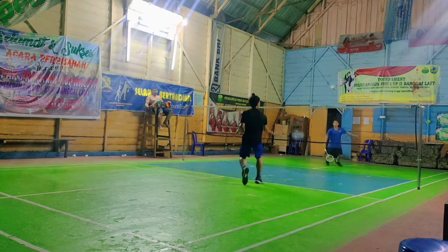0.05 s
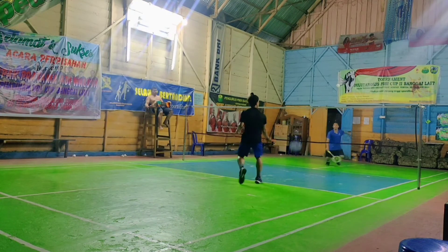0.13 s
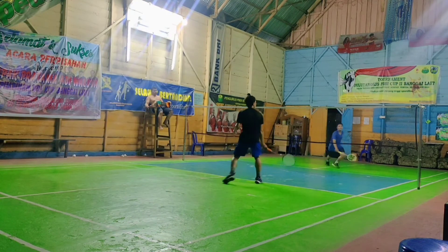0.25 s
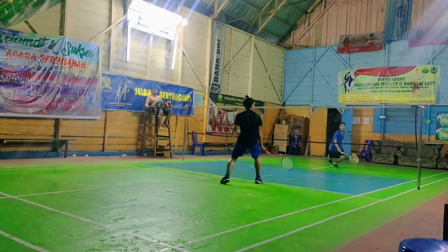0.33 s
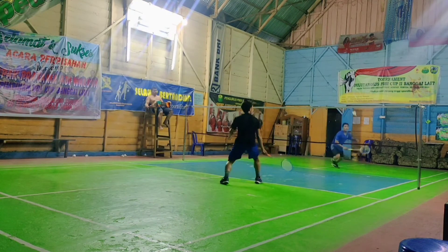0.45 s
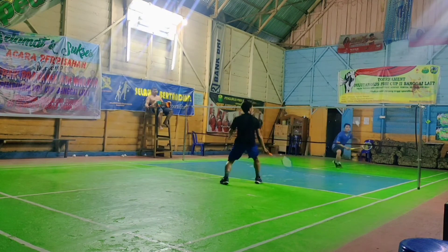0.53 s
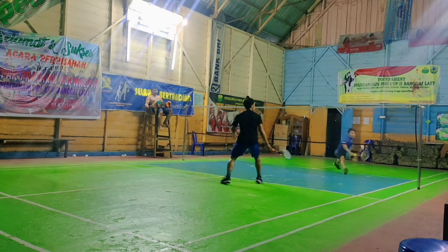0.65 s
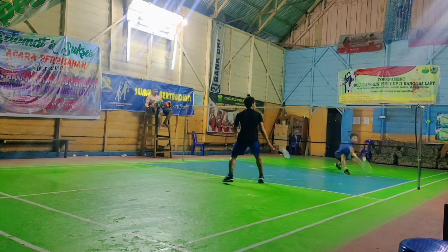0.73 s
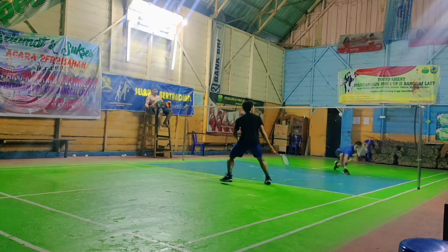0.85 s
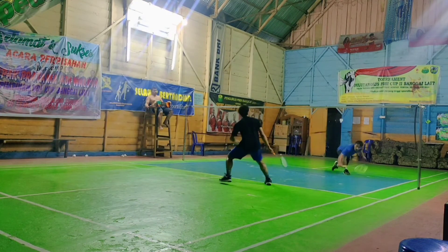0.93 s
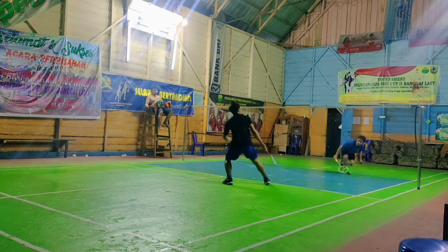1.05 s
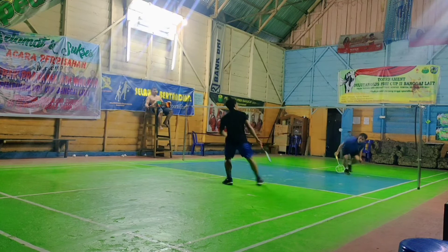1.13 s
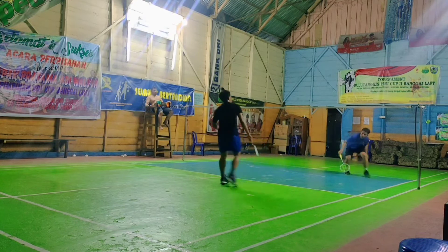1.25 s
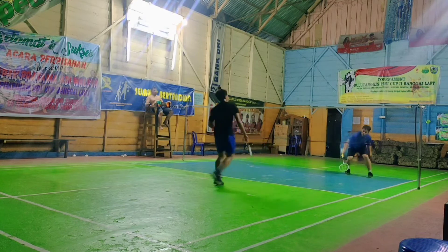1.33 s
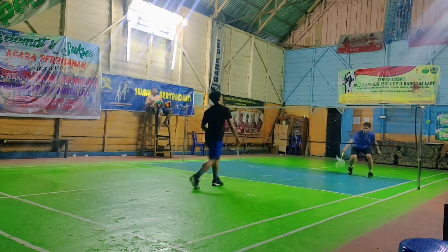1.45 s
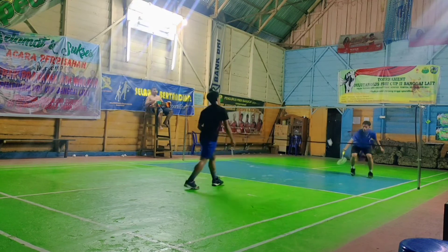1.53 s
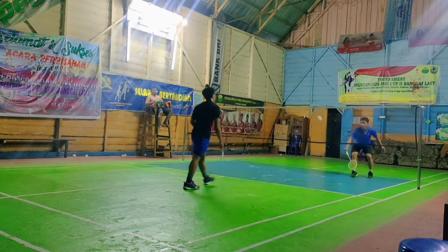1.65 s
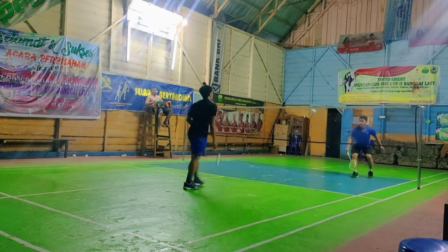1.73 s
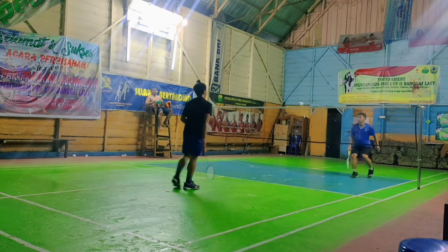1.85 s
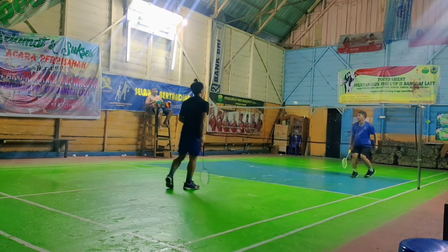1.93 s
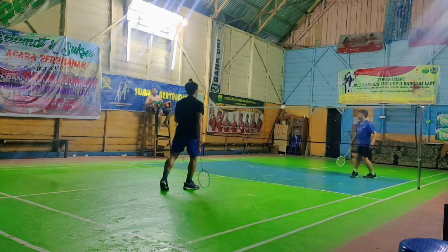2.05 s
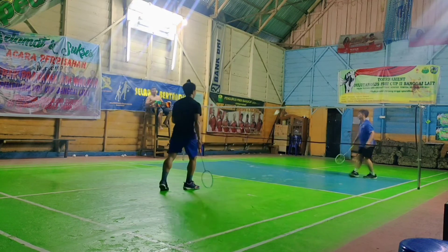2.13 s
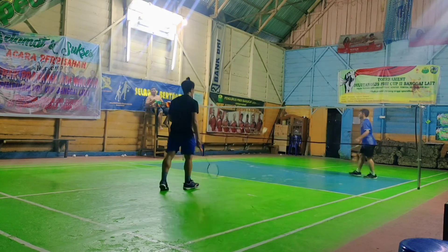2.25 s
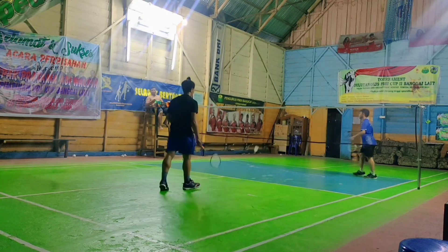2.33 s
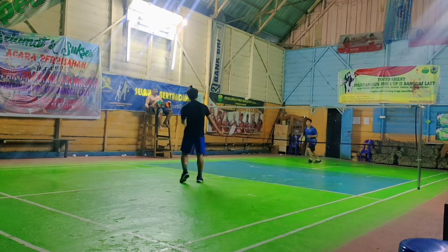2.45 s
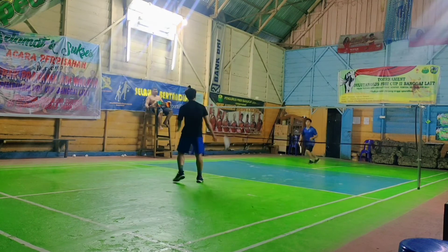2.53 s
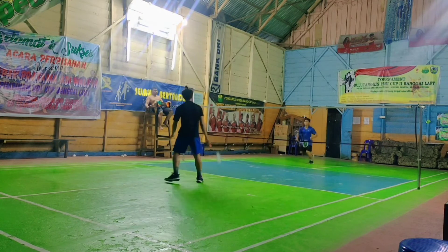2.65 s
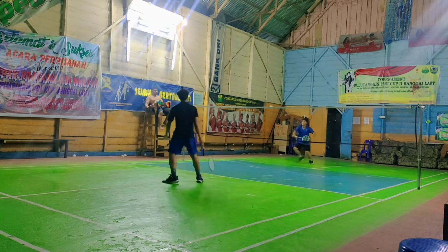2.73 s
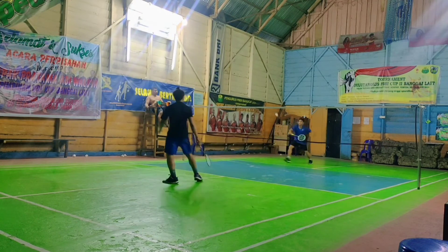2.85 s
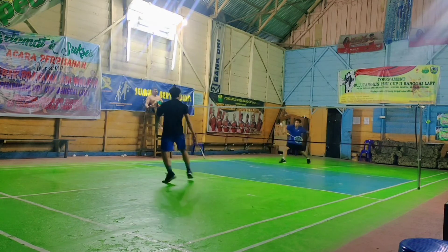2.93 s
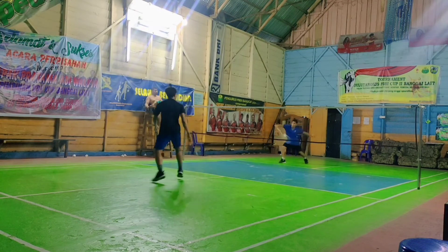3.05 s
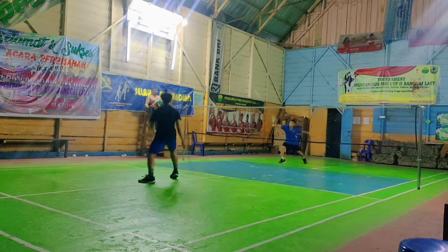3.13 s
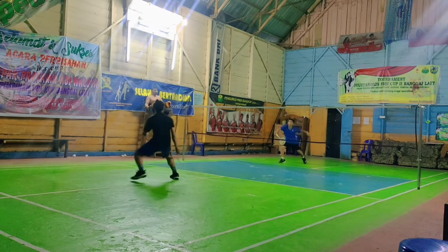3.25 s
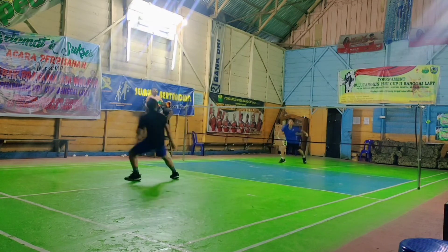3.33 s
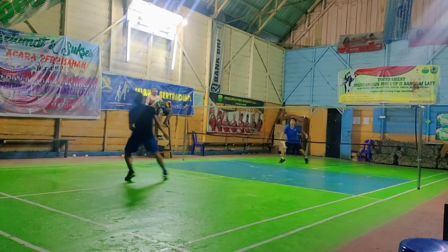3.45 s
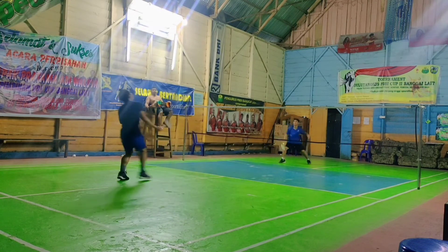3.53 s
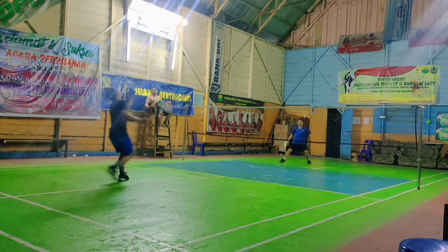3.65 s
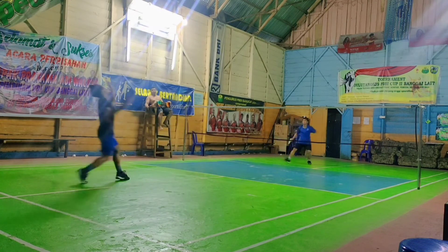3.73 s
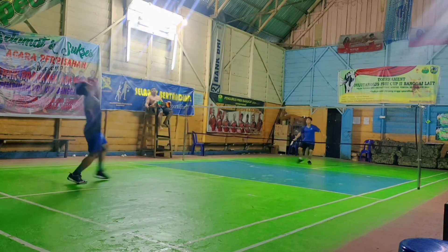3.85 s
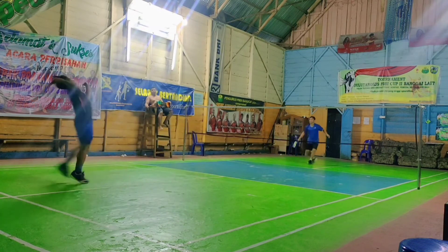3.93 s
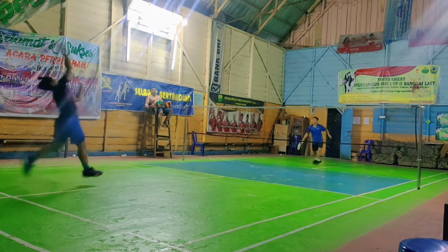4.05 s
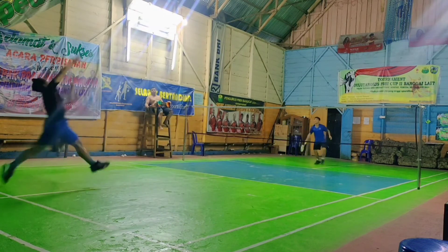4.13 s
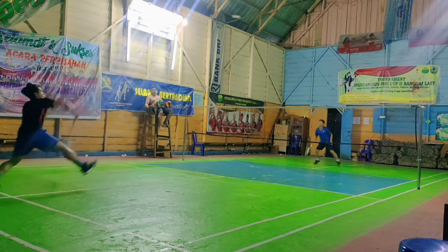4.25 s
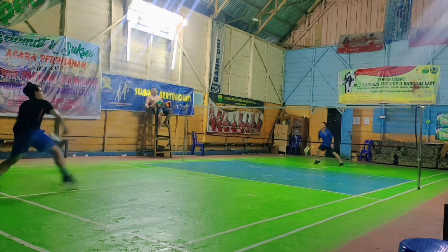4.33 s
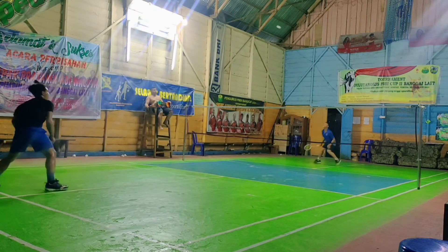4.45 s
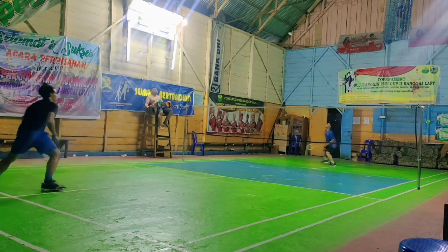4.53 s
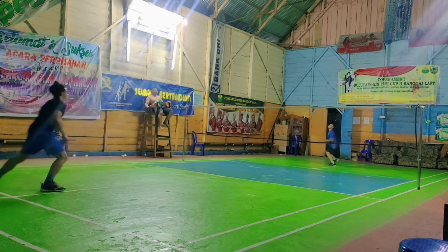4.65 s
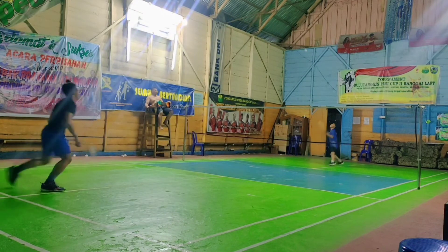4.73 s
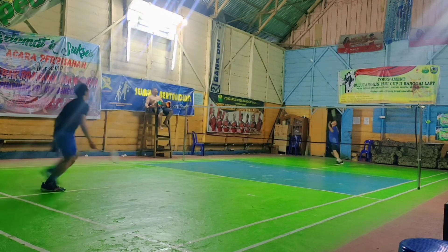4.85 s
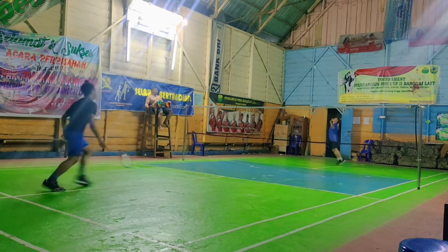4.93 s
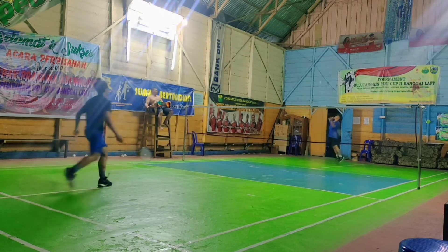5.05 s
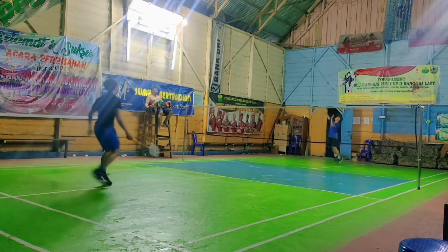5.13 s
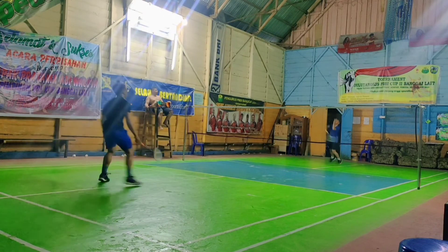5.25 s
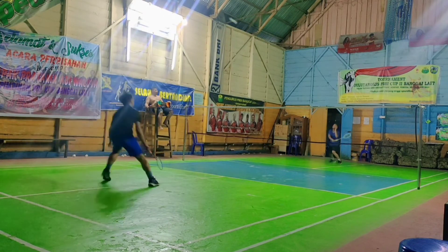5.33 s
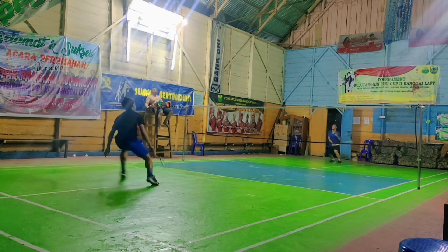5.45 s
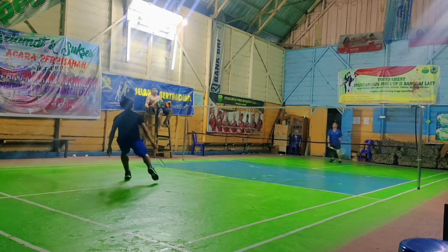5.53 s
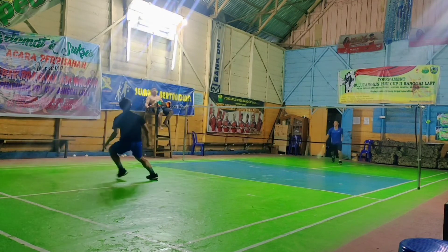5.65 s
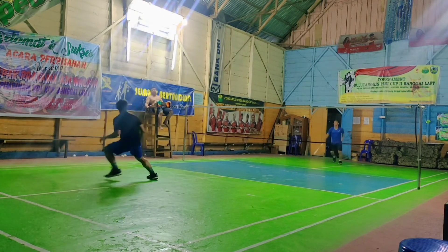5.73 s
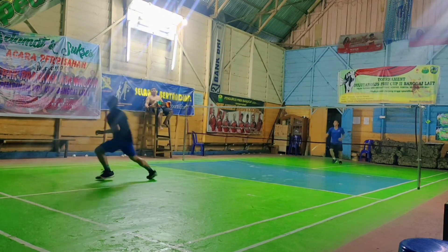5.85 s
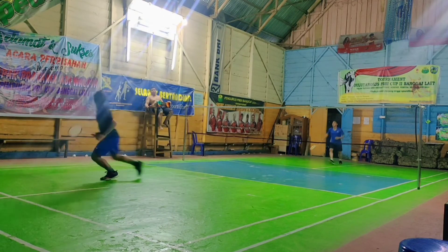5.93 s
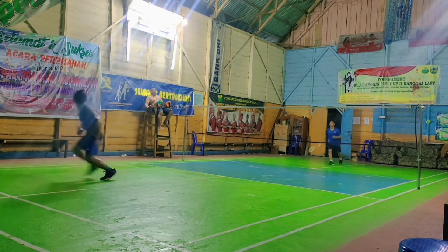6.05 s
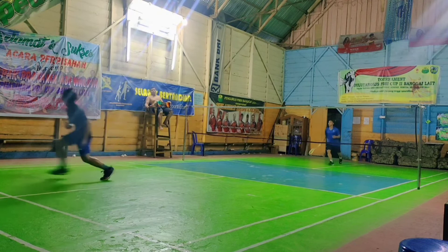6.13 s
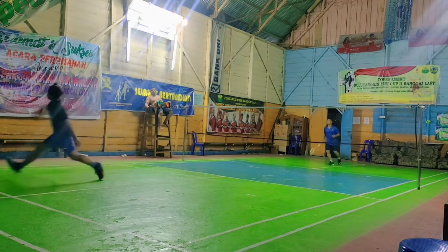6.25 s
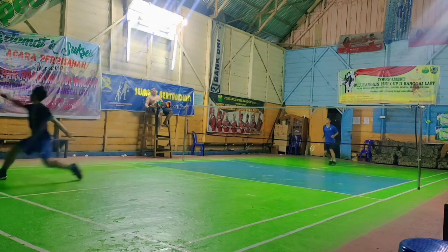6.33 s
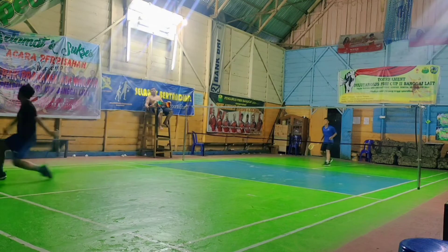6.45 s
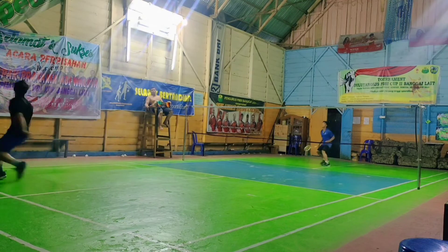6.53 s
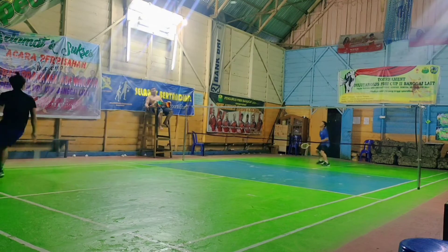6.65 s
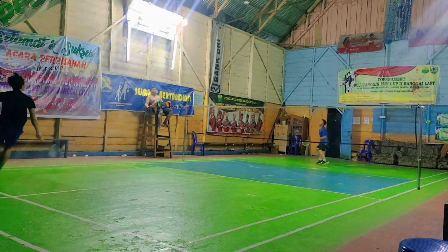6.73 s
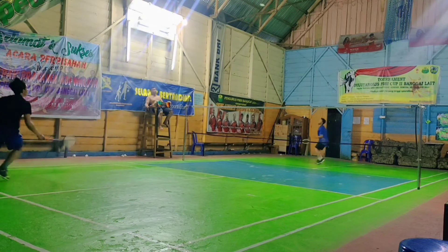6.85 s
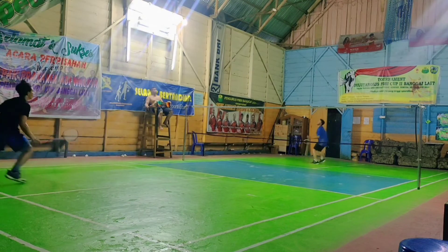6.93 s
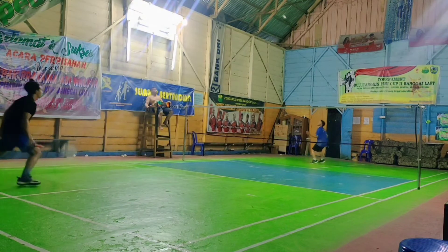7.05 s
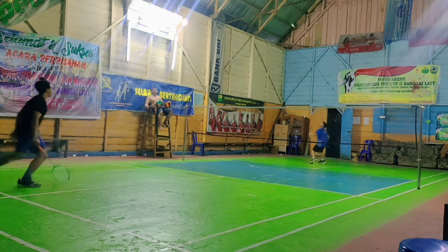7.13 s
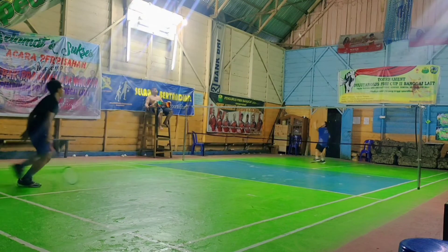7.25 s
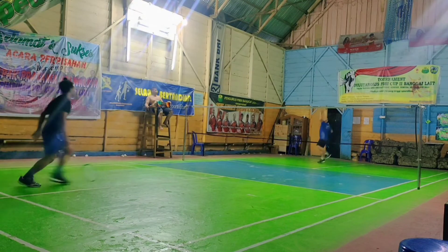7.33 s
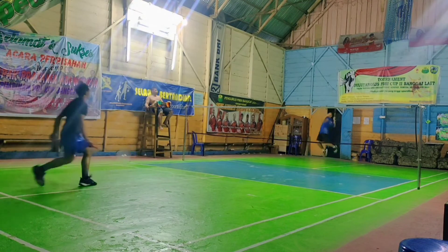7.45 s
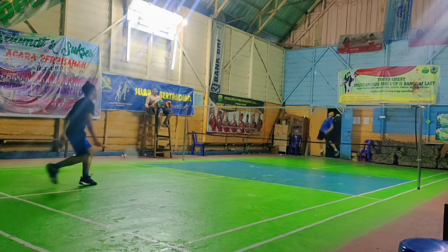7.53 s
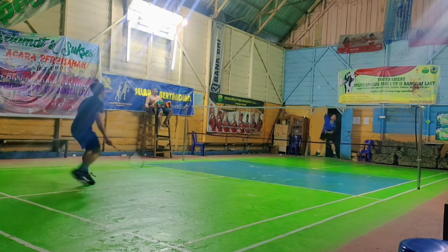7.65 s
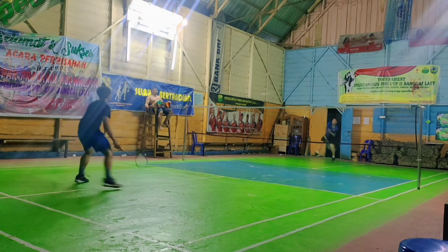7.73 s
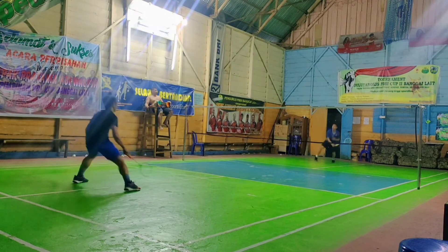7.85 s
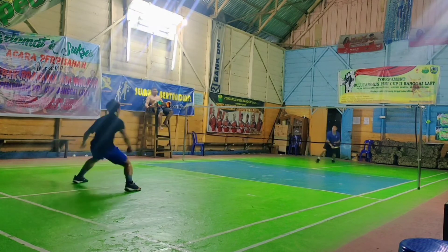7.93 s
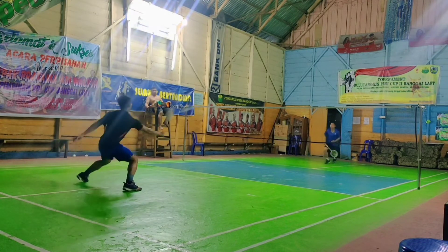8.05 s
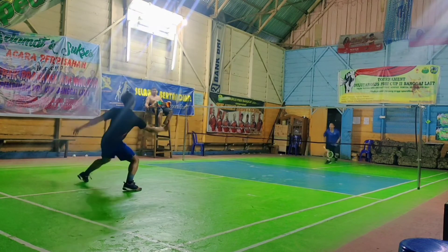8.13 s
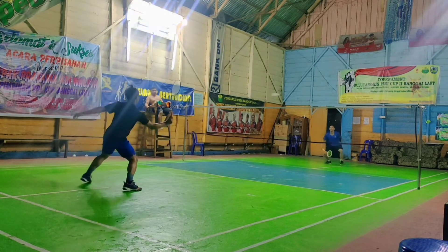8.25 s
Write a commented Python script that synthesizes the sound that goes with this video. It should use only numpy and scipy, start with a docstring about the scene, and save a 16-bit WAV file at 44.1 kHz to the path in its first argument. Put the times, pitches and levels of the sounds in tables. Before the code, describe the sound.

Two players rally at badminton in a big hard-walled hall, heard from courtside in stereo. A distant hit is still fading at first; then racket strikes snap and ring at irregular gaps of one or two seconds. Between them come brief high shoe squeaks, dry scuffs and thuds on the painted floor, some booming low. A quiet ventilation drone lies underneath, and everything echoes for about two seconds.

```python
"""A distant racket strike is still ringing in a large hard-walled sports hall, over droning ventilation.
Then a shuttlecock rally, heard from the court side by two spaced microphones: rackets swish as gliding
tones and strike as ringing modes with a crack of cork and feathers. Rubber soles squeak by stick-slip,
scuff as hiss and thud on the painted floor, which booms under landings.
Echoes and a hall response of thickening noise make the hall ring on for two seconds."""
import sys
import numpy as np
from scipy import signal
from scipy.io import wavfile

SR = 44100
rng = np.random.default_rng(int(sys.argv[2]) if len(sys.argv) > 2 else 0)


def linear_from_db(decibels):
    """Turn decibels (scalar or array-like) into linear amplitude factors; 0 gives 1."""
    return 10 ** (np.asarray(decibels, float) / 20)


def bounce(signal):
    """Save signal as a 16-bit WAV file at the path given by the first command-line argument."""
    frames = np.transpose(np.atleast_2d(signal))
    limited = np.clip(frames, -1, 1)
    pcm = np.round(limited * 32767).astype(np.int16)
    wavfile.write(sys.argv[1], SR, pcm)


N = 366030

DIRECT_DB = 2.5   # the straight path stands out before the hall answers


def rms_one(x):
    """Scale to an rms of 1."""
    return x / np.sqrt(np.mean(x ** 2) + 1e-20)


def at_hz(points, hz):
    """Read a curve of (hz, value) points along a logarithmic frequency axis."""
    points_hz, values = np.array(points).T
    return np.interp(np.log(hz), np.log(points_hz), values)


def band(x, low_hz, high_hz):
    """Keep what lies between two frequencies."""
    return signal.sosfilt(signal.butter(2, [low_hz, high_hz], "band", fs=SR, output="sos"), x)


def high_pass(x, order, hz):
    """Cut what lies below a frequency."""
    return signal.sosfilt(signal.butter(order, hz, "high", fs=SR, output="sos"), x)


def add(out, start_s, piece):
    """Lay a piece into a track at its time."""
    i = round(start_s * SR)
    out[..., i:i + piece.shape[-1]] += piece[..., :N - i]


def wander(size, hz):
    """Low-passed noise of spread 1, for slow unsteadiness."""
    noise = rng.standard_normal(size + 500)
    slow = signal.sosfilt(signal.butter(2, hz, fs=SR, output="sos"), noise)
    return rms_one(slow[500:])


def diffuse(white, shape):
    """Third-octave bands of (mid, side) noise become left and right by their likeness; shape(hz) is the gain."""
    # how alike the two spaced microphones hear sound from all around: hz, likeness (-1 to 1)
    likeness = [(60, 0.49), (130, 0.79), (290, 0.88), (640, 0.47), (1410, -0.37), (3100, 0.19),
                (6820, -0.075), (15000, 0.086)]
    out = 0
    edges = 28 * 2 ** np.arange(0, 9.5, 1 / 3)
    for k, (low_hz, high_hz) in enumerate(zip(edges, edges[1:])):
        mid, side = band(white[k % 2], low_hz, high_hz)
        centre_hz = np.sqrt(low_hz * high_hz)
        alike = np.clip(at_hz(likeness, centre_hz), -1, 1)
        pair = np.sqrt(1 + alike) * mid + np.sqrt(1 - alike) * side * [[1], [-1]]
        out = out + shape(centre_hz) * pair
    return out


def steady_air():
    """Steady noise of the hall's air, shaped in frequency and spread over both microphones."""
    # spectrum of the air before it is set to one overall level: hz, relative_db
    air_spectrum = [(30, -14), (100, -4.5), (160, -12), (260, -2.5), (420, -5), (700, -9.5), (950, -15.5),
                    (1300, -12), (2600, -17), (4000, -35), (8000, -32), (15000, -58)]
    air = diffuse(rng.standard_normal((2, 2, N)), lambda hz: linear_from_db(at_hz(air_spectrum, hz)))
    return linear_from_db(-60.5) * rms_one(air)


def hum():
    """Ventilation drones in a few narrow wavering lines, cut from noise."""
    # ventilation lines: centre_hz, width_hz, level_db
    drones = [(211.6, 13.6, -66.5), (261.4, 5.9, -66), (311.8, 7.5, -70)]
    white = rng.standard_normal(N)
    return sum(linear_from_db(db) * rms_one(band(white, hz - width_hz / 2, hz + width_hz / 2))
               for hz, width_hz, db in drones)


def floor_shake():
    """Each heavy landing sets the floor booming in lumps that die away; the landings add in power."""
    # landings that shake the floor: start_s, level_db
    landings = [(0.001, -57.5), (.26, -53), (.72, -52), (.84, -40.5), (1.72, -56), (2.2, -59.5),
                (3.19, -47.5), (3.7, -55.5), (4.181, -41), (4.839, -51), (5.27, -49), (5.571, -49.5),
                (6.15, -56), (6.41, -42), (7.17, -56.5), (7.8, -42), (8.13, -49)]
    rise_s, t60_s, lump_db = 0.0067, 1.69, 4.5
    t, power = np.arange(N) / SR, 0
    for start_s, db in landings:
        age_s = np.maximum(t - start_s, 0)
        swell = linear_from_db(db - 60 * age_s / t60_s) * (1 - np.exp(-age_s / rise_s))
        power = power + swell ** 2
    boom = rms_one(band(rng.standard_normal(N), 39.7, 102))
    return boom * linear_from_db(lump_db * wander(N, 7.8)) * np.sqrt(power)


def hall_response():
    """Reflections thicken with time, build up, then die band by band; mean energy per microphone is 1."""
    # time to die by 60 dB: hz, t60_s
    hall_t60 = [(100, 3.14), (260, 1.73), (700, 2.15), (1000, 2.29), (1840, 2.2), (4850, 1.82),
                (8000, 1.47), (12800, 1.19)]
    # tone of the hall: hz, gain_db
    hall_colour = [(60, -6), (150, -8), (400, -0.5), (1000, 0.5), (2500, 2.5), (4000, -1), (6000, 4.5),
                   (9000, -3.5), (14000, 2.5)]
    build_up_s = 0.009
    t = np.arange(round(2.6 * SR)) / SR
    density = np.clip((t / .08) ** 2, .06, 1)   # share of samples that hold a reflection
    struck = rng.random(len(t)) < density
    white = rng.standard_normal((2, 2, len(t))) * struck / np.sqrt(density)
    tail = diffuse(white, lambda hz: linear_from_db(at_hz(hall_colour, hz) - 60 * t / at_hz(hall_t60, hz)))
    return rms_one(tail * (1 - np.exp(-t / build_up_s))) / np.sqrt(len(t))


def far_ping(db):
    """Strings of a racket across the hall: only their main tone carries."""
    main_hz, t60_s = 919, 0.12
    t = np.arange(round(.2 * SR)) / SR
    return linear_from_db(db - 60 * t / t60_s) * np.sin(2 * np.pi * main_hz * t)


def footfalls():
    """A step on the floor is a short decaying sine with a slap of noise."""
    # footfalls: start_s, level_db, thud_hz, hall_send_db
    steps = [(0.209, -69, 208, 29.5), (.28, -51.5, 114, 8), (0.419, -57, 283, 17.5), (1.66, -47.5, 250, 10),
             (2.38, -59, 303, 16.5), (3.059, -63, 404, 7), (4.191, -39.5, 204, 19),
             (4.899, -36.5, 87.5, -1), (5.397, -34.5, 205, -4), (6.424, -31.5, 184, 3),
             (7.209, -39.5, 115, -1)]
    near, send = np.zeros((2, N)), np.zeros(N)
    t = np.arange(round(.05 * SR)) / SR
    for start_s, db, hz, send_db in steps:
        slap = band(rng.standard_normal(len(t)), 303, 1014) * np.exp(-t / 0.011)
        body = np.sin(2 * np.pi * hz * t) * np.exp(-t * hz / 1.2)
        thud = linear_from_db(db) * (1 - np.exp(-t / 0.0007)) * (body + 1.55 * slap)
        add(near, start_s, thud)
        add(send, start_s, linear_from_db(send_db) * thud)
    return near, send


def scuffs():
    """Soles that drag hiss: band-limited noise that swells and fades."""
    # dragging soles: start_s, level_db, length_s
    drags = [(.002, -62, 0.026), (0.413, -55.5, 0.0069), (0.798, -52, 0.077), (1.465, -48, 0.016),
             (1.909, -65.5, 0.26), (3.012, -73, .1), (3.467, -51.5, 0.0085), (3.63, -66, 0.018),
             (3.871, -64.5, 0.053), (5.069, -48.5, 0.039), (5.581, -36.5, 0.025), (6.417, -48, .0076),
             (6.843, -50, 0.0031), (7.504, -42, 0.028)]
    near, send = np.zeros((2, N)), np.zeros(N)
    for start_s, db, length_s in drags:
        hiss = rms_one(band(rng.standard_normal(SR // 2), 1200, 11900))[:round(length_s * SR)]
        hiss = linear_from_db(db) * hiss * np.hanning(len(hiss))
        add(near, start_s, hiss)
        add(send, start_s, hiss)
    return near, send


def squeaks():
    """Rubber soles stick and slip: gliding tones with two overtones, wobbling and fluttering."""
    # sole squeaks: start_s, level_db (before the sole's band and the distance), start_hz, end_hz, length_s
    slips = [(0.419, -57, 5500, 5700, 0.0078), (0.846, -53.5, 4900, 4730, 0.025),
             (1.446, -54, 4900, 5000, 0.013), (1.463, -46, 5100, 5390, 0.025),
             (1.474, -49, 4400, 4830, 0.0178), (3.237, -46.5, 4800, 4650, 0.018),
             (3.28, -45, 5510, 5120, 0.0082), (3.631, -56.5, 5610, 5400, 0.018),
             (3.875, -57, 5860, 6000, 0.009), (4.486, -44, 5300, 4960, 0.018),
             (4.671, -45.5, 4900, 4750, 0.042), (5.071, -46, 5300, 5100, 0.0079),
             (5.082, -36.5, 5300, 5160, 0.012), (5.091, -40, 4800, 4125, 0.024),
             (5.103, -48, 3800, 3120, 0.044), (5.434, -40, 4800, 5084, 0.045),
             (5.498, -41.5, 5000, 5040, 0.011), (5.54, -55, 4600, 4960, .010),
             (5.577, -47, 4600, 4550, 0.031), (5.6, -34, 5700, 5950, 0.032),
             (5.644, -42, 5850, 5990, 0.047), (5.756, -40, 4200, 4600, 0.01),
             (5.77, -35, 5200, 4680, 0.016), (6.87, -59.5, 5200, 5020, 0.028),
             (7.035, -46, 4900, 4980, 0.082), (7.514, -45, 4400, 4290, .034),
             (7.537, -38.5, 4200, 4060, 0.014), (7.543, -36, 4450, 4612, 0.031)]
    # how far off the squeaking feet are, as the two players take turns to lunge: time_s, distance_m
    feet = [(.4, 5.4), (.85, 7.8), (1.5, 6), (3.25, 10.3), (3.63, 4), (3.88, 30), (4.5, 15.4), (5.1, 8.9),
            (5.53, 10.4), (5.61, 15), (5.76, 10), (6.87, 5.3), (7.04, 13), (7.5, 5.8)]
    reference_m = 20   # from here the straight path is DIRECT_DB over the hall send
    wobble, flutter_db, rasp_db = .02, 3.5, -11   # wobble is a share of the pitch
    octave_db, third_db = -8, -7   # second and third partial
    near, send = np.zeros((2, N)), np.zeros(N)
    for start_s, db, start_hz, end_hz, length_s in slips:
        size = round(length_s * SR)
        pitch_drift, level_drift, rasp = [wander(4000, hz)[:size] for hz in (250, 450, 3500)]
        hz = np.linspace(start_hz, end_hz, size) * (1 + wobble * pitch_drift)
        turn = 2 * np.pi * np.cumsum(hz) / SR
        phase = turn + [[0], [np.pi / 2]]   # spaced microphones hear the tone a quarter cycle apart
        tone = np.sin(phase)
        tone = tone + linear_from_db(octave_db) * np.sin(turn + phase)
        tone = tone + linear_from_db(third_db) * np.sin(2 * turn + phase)
        tone = tone * (linear_from_db(flutter_db * level_drift) + linear_from_db(rasp_db) * rasp)
        tone = rms_one(tone * np.hanning(size) ** .5)
        tone = linear_from_db(db) * band(tone, 3100, 9750)   # the sole radiates between these
        distance_m = np.interp(start_s, *np.transpose(feet))
        add(near, start_s, linear_from_db(DIRECT_DB) * reference_m / distance_m * tone)
        add(send, start_s, tone[0])
    return near, send


def swishes():
    """A racket head cutting the air sheds vortices off the frame: an unsteady whistle that climbs and swells."""
    # swings: start_s, end_s, level_db, start_hz
    swings = [(0.795, 0.891, -50, 421.7), (4.148, 4.208, -44.5, 536.7), (5.275, 5.29, -40, 527),
              (6.434, 6.483, -46.5, 488.6), (7.8, 7.825, -38, 855)]
    rise = 1.65   # the whistle climbs by this ratio as the head speeds up
    near, send = np.zeros((2, N)), np.zeros(N)
    for start_s, end_s, db, hz in swings:
        size = round((end_s - start_s) * SR)
        whistle = np.sin(2 * np.pi * np.cumsum(np.linspace(hz, rise * hz, size)) / SR)
        unsteady = 1.13 + wander(5000, 200)[:size]
        air = linear_from_db(db) * whistle * unsteady * np.linspace(0, 1, size) ** 0.46
        add(near, start_s, air)
        add(send, start_s, linear_from_db(-0.5) * air)
    return near, send


def ring(thump_db):
    """The cork sets strings and frame ringing for a few cycles, each mode a decaying sine."""
    # modes of the strung racket, those under 500 Hz being the frame thump: hz, relative_db, t60_s
    modes = [(250, -9.5, 0.0047), (298, -0.5, 0.0089), (743, 3.5, 0.0066), (972, 1, 0.016),
             (1206, -7, 0.0065), (1486, 0, 0.0059), (1980, 1.5, 0.0032), (2664, -17.5, 0.017)]
    t, out = np.arange(round(.06 * SR)) / SR, 0
    for hz, mode_db, t60_s in modes:
        db = mode_db + rng.normal(0, 1) - 9   # each blow excites the modes a little differently
        if hz < 500:
            db += thump_db + 14.5
        out = out + linear_from_db(db - 60 * t / t60_s) * np.sin(2 * np.pi * hz * t)
    return high_pass(out, 4, 190)   # a small head radiates no deep bass


def crack(edge):
    """The crack of cork and feathers: only the treble of the contact."""
    return band(edge, 3740, 9440)


def strikes():
    """Each strike rings and cracks; it and its first echoes reach the two microphones at different times."""
    # blows: start_s, strings_db, thump_db (-14.5 leaves the frame modes as listed), hall_send_db,
    # left_lag_ms (before a random shift of each path)
    blows = [(0.8853, -19, -12.5, 4.5, 0.037), (3.2013, -27.5, -1.5, 5.5, 0.12), (4.202, -12, -21, 2, 0.11),
             (4.4553, -17, -24, -8, 0.37), (5.29, -12, -12.5, 2.5, -.1), (6.49, -20.5, -18.5, 7.5, 0.46),
             (7.815, -7, -13.5, 2.5, -0.064)]
    # first echoes: delay_ms, level_db
    echoes = [(1.3, -4), (4.4, -4), (7.3, -3), (10, -6.5), (14, -9), (18.5, -7), (23, -5.5), (34, -10.5),
              (52, -3)]
    feather_s, close_brightens = 0.0035, 0.81   # crack gains this many dB per dB of hall send under zero
    near, send = np.zeros((2, N)), np.zeros(N)
    t = np.arange(1024) / SR
    for start_s, db, thump_db, send_db, lag_ms in blows:
        crack_db = db + close_brightens * max(-send_db, 0)
        blow = linear_from_db(db) * ring(thump_db)
        add(send, start_s, linear_from_db(send_db) * blow)
        click = 1. * (t == 0)
        add(send, start_s, linear_from_db(crack_db + send_db + 8) * crack(click))
        for k, (delay_ms, path_db) in enumerate([(0.008, DIRECT_DB)] + echoes):
            shift_ms = rng.normal(0, .15)   # each path arrives from a slightly different side
            for side, late_ms in zip(near, (delay_ms + lag_ms + shift_ms, delay_ms - shift_ms)):
                arrival_s = start_s + late_ms / 1000
                # the feathers scatter anew on each path
                feathers = crack(rng.standard_normal(len(t)) * np.exp(-t / feather_s))
                add(side, arrival_s, linear_from_db(path_db) * (-1) ** k * blow)   # every other path is inverted
                add(side, arrival_s, linear_from_db(crack_db + path_db - 13.5) * feathers)
    return near, send


def scene():
    """Straight paths, the hall's answer to what is sent to it, the steady air, the floor and the hum."""
    near, send = np.zeros((2, N)), np.zeros(N)
    for source in (footfalls, scuffs, squeaks, swishes, strikes):
        source_near, source_send = source()
        near += source_near
        send += source_send
    add(send, 2.362, far_ping(-49.5))   # a distant strike
    response = hall_response()
    hall = signal.fftconvolve(send[None], response, axes=1)[:, :N]
    # a distant strike a quarter second before the start still rings
    earlier = signal.fftconvolve(far_ping(-46.5)[None], response, axes=1)
    add(hall, 0, earlier[:, SR // 4:])
    return near + linear_from_db(7.5) * hall + steady_air() + floor_shake() + hum()


def band_limit(x):
    """A steep low-pass at the top of the band."""
    return signal.sosfilt(signal.butter(12, 16480, fs=SR, output="sos"), x)


def record(dry):
    """Each microphone port lifts the treble around its resonance, bass is cut, the level dips briefly once."""
    # port resonances of the two microphones: centre_hz, width_hz, lift_db
    left_port = (4600, 2000, 3)
    right_port = (8500, 1600, 11)
    # the brief dip in level: time_s, half_width_s, depth_db
    dip = (2.354, .005, -12)
    out = []
    for side, (hz, width_hz, lift_db) in zip(dry, (left_port, right_port)):
        resonance = signal.lfilter(*signal.iirpeak(hz, hz / width_hz, fs=SR), side)
        out.append(side + (linear_from_db(lift_db) - 1) * resonance)
    out = high_pass(out, 2, 143.6)
    dip_s, half_width_s, depth_db = dip
    t = np.arange(N) / SR
    out = out * linear_from_db(depth_db * np.exp(-((t - dip_s) / half_width_s) ** 2))
    return band_limit(out)


dry = scene()
out = record(dry)
bounce(out)
```